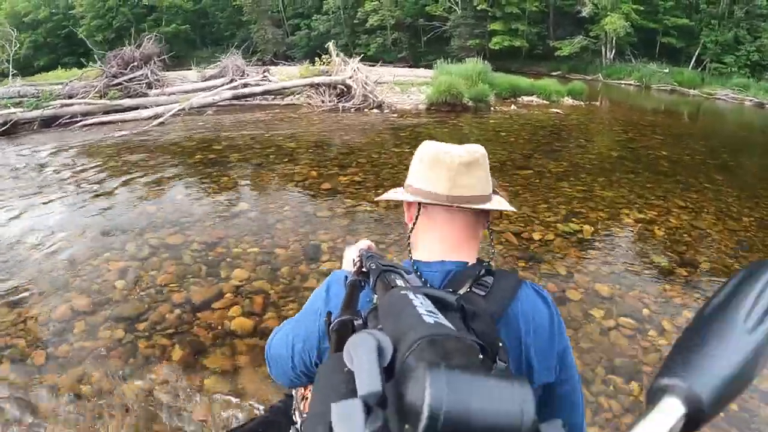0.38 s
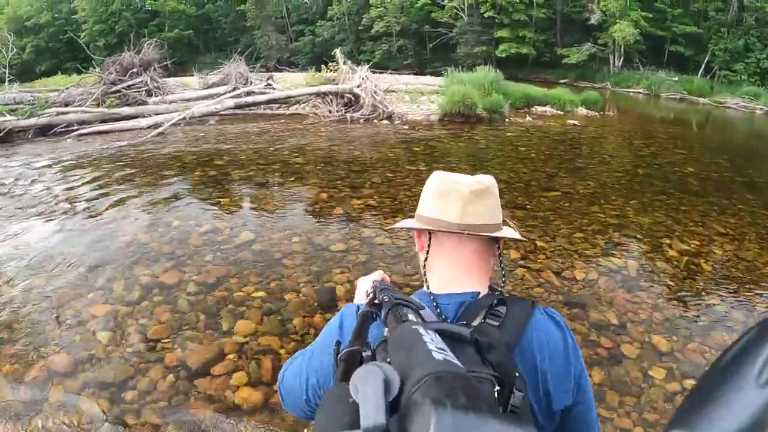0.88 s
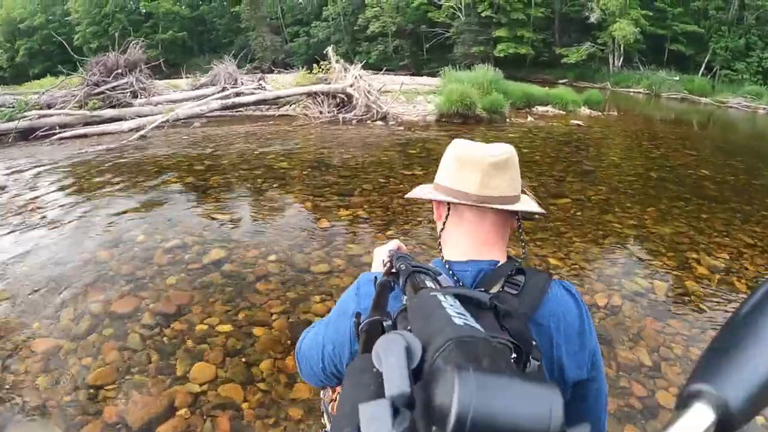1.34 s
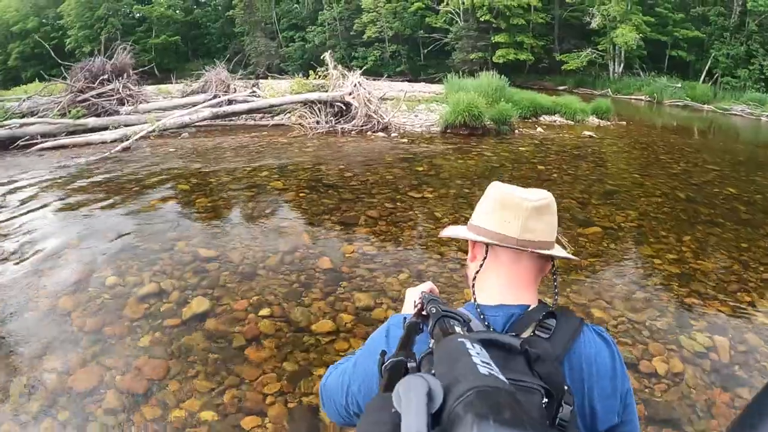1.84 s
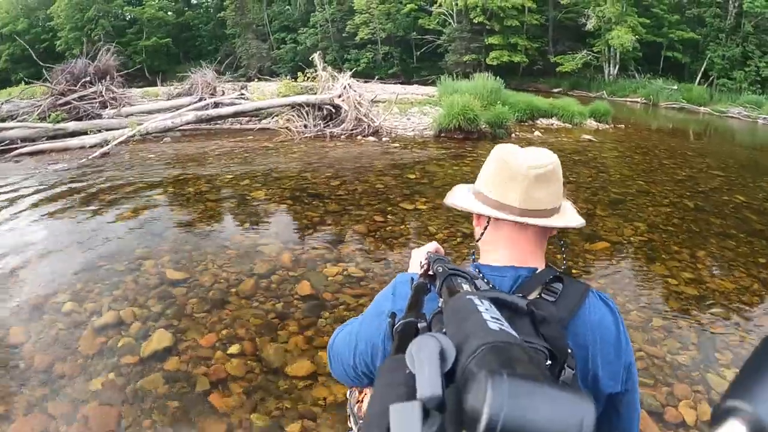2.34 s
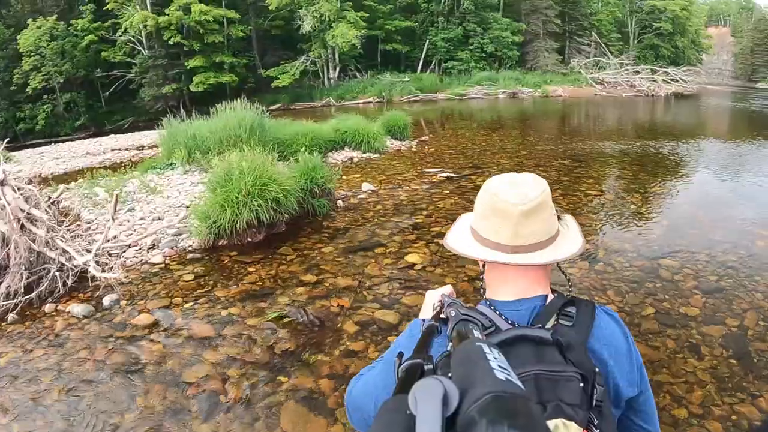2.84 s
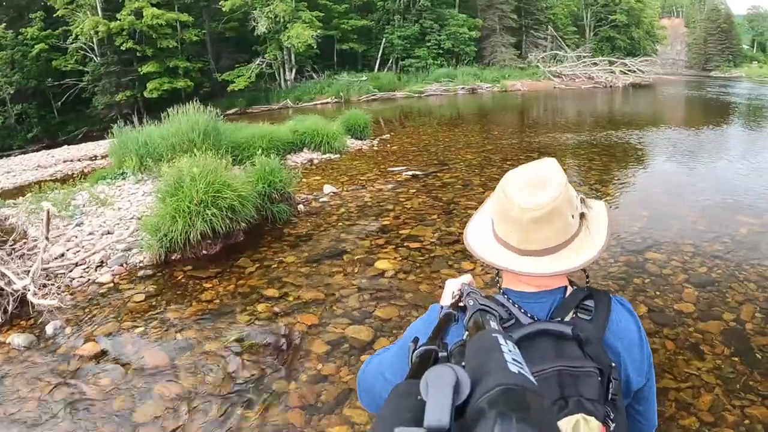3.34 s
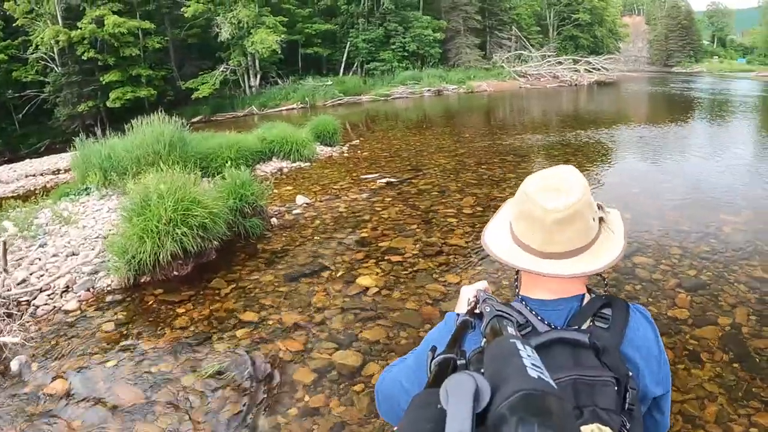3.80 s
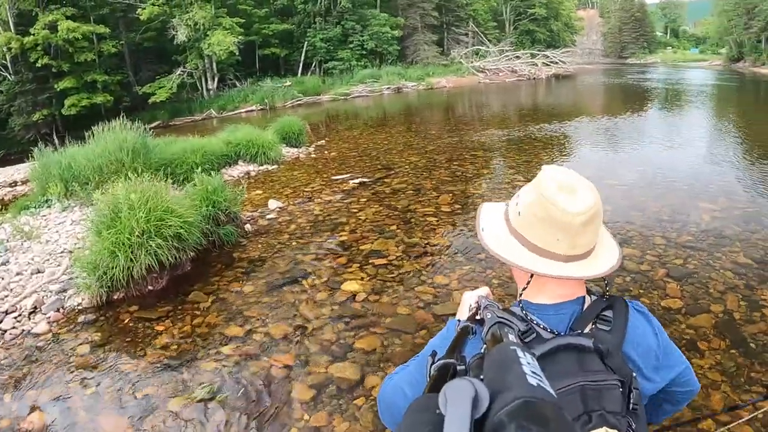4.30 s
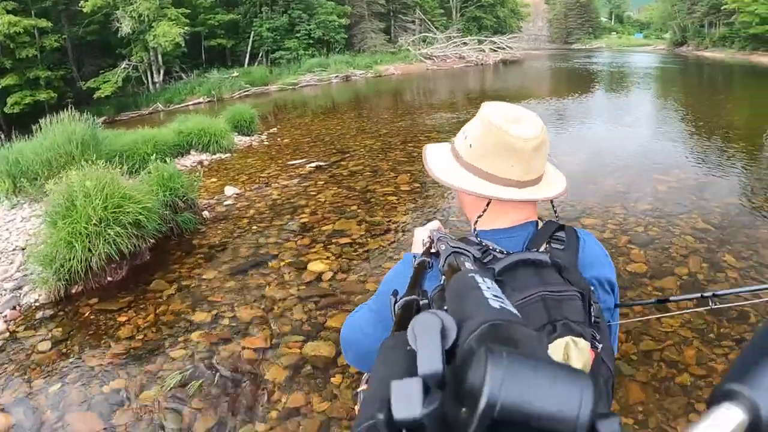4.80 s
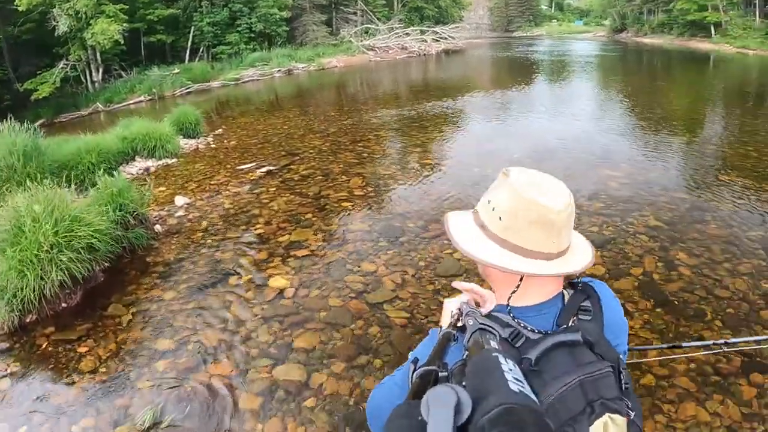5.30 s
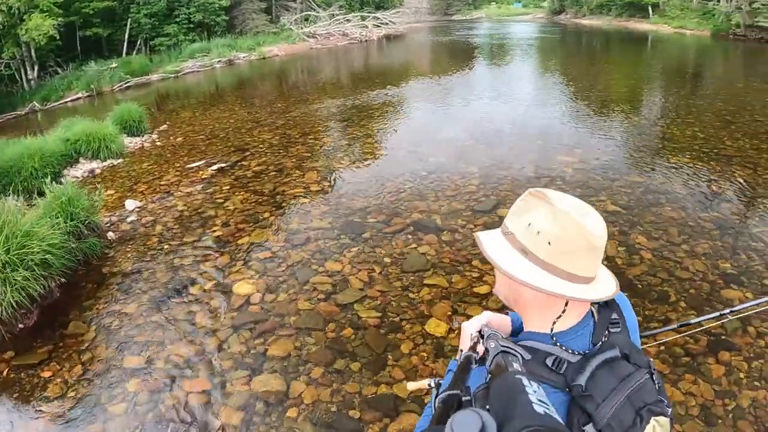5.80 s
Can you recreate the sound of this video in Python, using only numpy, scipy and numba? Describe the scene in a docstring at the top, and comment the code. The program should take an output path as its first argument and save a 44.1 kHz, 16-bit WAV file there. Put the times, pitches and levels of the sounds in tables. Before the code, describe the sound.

Close stereo sound of wading in a stony stream, heard from just behind. Thin, hissy splashing with small high plops gives way at a quick cut to fuller, darker sloshing, gulped air and rounder bubbles. The water calms towards the end and leans left; soft wind rumble flutters on the microphone throughout.

```python
"""Legs wade through a shallow stony river, heard from just behind, in two stretches joined by a quick fade:
first bright, thin splashing near the bank, then a louder, duller churn in deeper water.
Swarms of short damped tones (air bubbles) ring over filtered noise (the rush of the current), with single
plops and rising gurgles on top. Drops are short bursts of hiss; wind on the microphone ports is a low rumble."""
import sys
import numpy as np
from scipy import signal
from scipy.fft import rfft, irfft, next_fast_len
from scipy.io import wavfile
from scipy.ndimage import uniform_filter1d, map_coordinates
from numba import njit

SR = 44100
rng = np.random.default_rng(int(sys.argv[2]) if len(sys.argv) > 2 else 0)


def natural_amplitude(level_db):
    """Convert a level in decibels to a linear amplitude factor, elementwise."""
    exponent = np.asarray(level_db, float) / 20
    return 10 ** exponent


def store_pcm(level_fs):
    """Save levels as 16-bit WAV."""
    pcm = np.round(np.clip(level_fs, -1, 1) * 32767).astype(np.int16)
    wavfile.write(sys.argv[1], SR, np.atleast_2d(pcm).T)


N = 260542  # length in samples

JOIN_S, FADE_S = 2.666, 0.01  # the first stretch ends and the second begins here; length of the fade in
# per stretch: wind level between puffs; low wash between sloshes, relative to the churn
CALM_DB, WAKE_DB = (-53.5, -43), (-20.5, -12)

# colour of the water, one list per stretch: pitch_hz, relative_level_db
WATER_COLOUR = [
    [(13, -39), (22, -19), (55, 0), (110, -9.5), (190, -9.5), (300, -6), (467, -3), (705, -3.5), (832, -4),
     (1290, -4.5), (2120, -3), (6030, -20.5), (9370, -22.5), (15800, -29)],
    [(13, -33), (22, -5), (48, -2.5), (110, -10), (190, -15), (389, -6.5), (1060, -4.5), (1150, -5.5),
     (1770, -9.5), (2460, -15), (6880, -32), (10900, -43), (14300, -54)],
]
# the two ports differ in tone: pitch_hz, left_minus_right_db
PORT_LEAN = [(60, -5.5), (130, -2), (300, 0), (1000, 2), (5000, 2), (9000, 3.5), (15000, 4.5)]
# wind, low wash, churn and spray, in that order: low_hz, high_hz, bubbles_per_s (in each swarm),
# ring_cycles (each bubble takes 0.19 to 0.69 of this to decay), size_scatter_db, clumping_db,
# bubbles_over_rush_db, patchiness_db, quietest_db
LAYERS = [(14.5, 199.3, 33, 2.7, 4.5, 1, -20, 1, -59), (185.4, 430.6, 160, 3.65, 4.5, 1.5, -11, 3, -73),
          (450, 3242, 1100, 7.97, 2, 1.57, -3, 1.4, -59), (3263, 15670, 2800, 7.1, 3, 4.5, -1, 0.9, -48.5)]
# big single bubbles: start_s, level_db, pitch_hz
PLOPS = [(.048, -20.5, 450), (0.0813, -15, 407), (0.121, -22, 450), (.1644, -7.5, 1850), (0.198, -21, 400),
         (0.3685, -18, 1230), (0.409, -16.5, 1140), (.5315, -20.5, 563), (.588, -27, 335),
         (.7476, -14, 523), (.7543, -19, 1030), (0.793, -18, 1440), (.9149, -14, 2020),
         (.9663, -15.5, 2070), (1.1444, -14, 3080), (1.1495, -14.5, 1460), (1.1545, -14, 2020),
         (1.161, -15, 3270), (1.1586, -10, 2700), (1.166, -16.5, 1010), (1.209, -21, 573),
         (1.2197, -9, 2190), (1.2237, -16, 680), (1.2656, -14, 1980), (1.276, -20, 1030),
         (1.4779, -20, 342), (1.681, -15, 1110), (1.7014, -16.5, 306), (1.8069, -17, 610),
         (1.8268, -15, 2700), (2.0987, -11.5, 1820), (2.182, -12, 910), (2.1935, -10, 616),
         (2.2145, -17, 1800), (2.4854, -21.5, 273), (2.4968, -21.5, 450), (2.6784, -16, 1130),
         (2.6885, -11, 1110), (2.723, -11, 1300), (2.8516, -11, 441), (2.9747, -9.5, 2180),
         (3.1878, -8, 2020), (3.28, -13, 1060), (3.4472, -12.5, 3040), (3.631, -9.5, 1920),
         (3.743, -8, 1130), (3.887, -11.5, 960), (3.923, -11.5, 880), (4.168, -13.5, 2340),
         (4.259, -10.5, 1020), (4.2773, -13.5, 4000), (4.3651, -15, 780), (4.4976, -16, 1540),
         (4.5425, -11, 1255), (4.6853, -16, 250), (4.7687, -7.5, 790), (4.7846, -3, 760),
         (4.8086, -6.5, 680), (4.8744, -10.5, 625), (4.891, -13, 2980), (4.9552, -13, 1500),
         (5.117, -14, 1640), (5.3261, -26, 318), (5.41, -19, 2200), (5.489, -17, 960), (5.552, -18, 269),
         (5.754, -17, 2860), (5.8273, -13.5, 915)]
# drops that land on the surface: start_s, level_db, treble_db (bright hiss relative to dull hiss)
DROPS = [(1.145, -25, -20), (1.16, -26.5, 7), (1.294, -18, -4), (1.3214, -21.5, 8), (1.3488, -37, -6),
         (1.401, -28, 14.5), (1.48, -32, 12), (1.535, -32, 15), (1.685, -33, 14), (1.7649, -28, 4),
         (1.85, -36, 12), (1.875, -37, 12), (1.897, -29, 8), (2.072, -19, -5), (2.091, -21, 3),
         (2.4389, -22, -12), (2.511, -17.5, -10), (2.6249, -17, -10), (2.7147, -15.5, -12),
         (2.8883, -24, -10), (3.054, -19, -16), (3.399, -19, -25), (3.62, -19, -20), (3.708, -18, -24),
         (4.0444, -12, -12), (4.0821, -12, -26), (4.168, -15, -15), (4.2763, -18, -12), (4.589, -23, -10),
         (4.776, -18, -20), (4.888, -16, -15), (5.001, -21.5, -13), (5.1083, -24, -15), (5.204, -28, -12),
         (5.3084, -31, -17), (5.3732, -29, -10), (5.623, -17, -20), (5.7, -22, -8), (5.752, -25, -12)]
# how wide the water sounds, one list per stretch: pitch_hz, unrelated_under_shared_db
WATER_WIDTH = [
    [(30, -22), (70, -10), (170, -12), (350, -25), (1200, -30), (4000, -32), (9000, -28), (15000, -32)],
    [(30, -0.5), (70, -11.5), (160, -10), (350, -17.5), (1200, -13), (3200, -9.5), (4200, -27), (8000, -16),
     (15000, -11)],
]
# effort of the legs, one list per stretch: time_s, churn_db, spray_over_churn_db
LEG_EFFORT = [
    [(0, -28.5, -0.5), (.09, -26.5, 2.5), (.26, -29.5, -2), (.43, -30, -1), (.6, -35, 2), (.72, -36.5, 1),
     (.94, -29.5, -2), (1.1, -33, -3), (1.19, -30, -3.5), (1.36, -30.5, 0.5), (1.7, -31, 0.5),
     (1.87, -29.5, 1), (2.03, -31.5, -3.5), (2.21, -27.5, -1.5), (2.3, -29, 1), (2.42, -32.5, -3),
     (2.65, -29.5, -1)],
    [(2.68, -20, -10), (2.86, -19.5, -10.5), (3.1, -22.5, -8.5), (3.27, -22.5, -10), (3.37, -20, -11.5),
     (3.61, -21.5, -10), (3.72, -25.5, -10), (3.87, -26.5, -9.5), (4.04, -23, -10.5), (4.13, -26, -7.5),
     (4.29, -25.5, -9), (4.46, -25.5, -12), (4.54, -26, -11.5), (4.63, -29, -8), (4.72, -23.5, -10),
     (4.97, -27, -8.5), (5.06, -28.5, -10), (5.22, -33.5, -10.5), (5.31, -30.5, -13.5), (5.42, -35, -11),
     (5.56, -29, -12), (5.65, -27.5, -7.5), (5.74, -29.5, -13), (5.84, -27.5, -8.5), (5.9, -31, -10.5)],
]
# direction of the water: time_s, left_minus_right_db
BEARING = [(0, -1), (1.1, -1), (2.6, 0.2), (2.7, -0.5), (4.1, 0), (4.6, 2), (5.9, 3)]
# water heaved aside by a shin: crest_s, level_db, length_s
SLOSHES = [(.08, -31, 0.13), (.23, -33.5, 0.26), (.57, -40, 0.13), (1.12, -35.5, 0.18), (1.51, -35.5, 0.21),
           (1.7, -37, 0.043), (1.95, -32.5, 0.086), (2.21, -36, 0.047), (2.49, -32, 0.11),
           (2.64, -35, 0.066), (2.86, -24.5, 0.15), (3.0, -29.5, 0.52), (3.66, -38, 0.084),
           (4.02, -47, 0.079), (4.32, -30, 0.071), (4.6, -32.5, 0.14), (4.69, -30, 0.054),
           (4.95, -31.5, 0.41), (5.33, -34, 0.11), (5.56, -33, 0.087), (5.83, -40, 0.22)]
# puffs of wind on the ports, with low knocks among them (near 1.55, 2.86 and 3.36 s): crest_s, level_db,
# length_s
GUSTS = [(.05, -41, 0.18), (.25, -34, .14), (.48, -45, 0.092), (.62, -31, .16), (.76, -34, 0.087),
         (1.0, -42, .08), (1.1, -39, 0.11), (1.3, -43, 0.34), (1.55, -30.5, 0.11), (1.71, -34, 0.18),
         (2.0, -41, 0.25), (2.5, -34, .1), (2.72, -38, 0.12), (2.86, -29.5, 0.13), (3.36, -30.5, 0.045),
         (3.64, -22.5, 0.21), (4.3, -43, 0.12), (4.7, -33, 0.25), (5.25, -31, 0.59), (5.55, -32, 0.24),
         (5.75, -33.5, .2), (5.88, -39, 0.12)]
# air gulped under a boot: start_s, level_db, starting_pitch_hz, decay_s
GURGLES = [(.225, -24, 304, .012), (1.045, -28, 1330, .006), (1.228, -34, 693, .012), (2.2, -22, 614, .014),
           (2.815, -16.5, 303, .02), (2.93, -19, 331, 0.0293), (3.38, -17, 707, .014),
           (3.51, -15.5, 479, 0.022), (4.02, -21.5, 329, .015), (4.33, -19.5, 597, .022),
           (5.05, -22, 480, .012), (5.29, -26, 475, .02), (5.52, -25, 197, .025)]
# highest pitch let through in each stretch: top_hz
TOP_HZ = (15830, 14250)


def unit(x):
    """Scales a sound to an rms of 1."""
    return x / np.sqrt(np.mean(x ** 2) + 1e-20)


def along(points, hz):
    """Reads a curve of (pitch_hz, value) points on a log pitch axis."""
    point_hz, value = np.transpose(points)
    return np.interp(np.log(hz + 1), np.log(point_hz + 1), value)


def filtered(x, response):
    """Multiplies the spectrum of x by a response of frequency."""
    size = next_fast_len(N + 8192)  # spare room at the end for the filter's tail
    hz = np.fft.rfftfreq(size, 1 / SR)
    return irfft(rfft(x, size) * response(hz), size)[..., :N]


def curves(rows):
    """Draws straight lines between the rows: one curve for each column after the time."""
    time_s, *columns = np.transpose(rows)
    return [np.interp(np.arange(N) / SR, time_s, column) for column in columns]


def surges(rows):
    """Smooth bell-shaped swells; where they overlap their powers add."""
    t = np.arange(N) / SR
    power = np.zeros(N)
    for crest_s, level_db, length_s in rows:
        bell = np.exp(-(2 * (t - crest_s) / length_s) ** 2)
        power += (natural_amplitude(level_db) * bell) ** 2
    return np.sqrt(power)


def wobble(rate):
    """A smooth random curve with rate random points a second."""
    knots = rng.standard_normal(int(N * rate / SR) + 4)
    return map_coordinates(knots, [np.arange(N) * rate / SR])


@njit
def add(out, start, hz, cycles, size, rise, attack):
    """Adds damped sines with a soft start; the pitch climbs as each bubble nears the surface."""
    for g in range(len(start)):
        life = cycles[g] * SR / hz[g]  # samples in which it decays to 1/e
        first = int(start[g])
        for i in range(first + 1, min(len(out), first + int(7 * life) + 2)):
            u = max(i - start[g], 0.) / life
            phase = 2 * np.pi * cycles[g] * (u + rise * u * u / 2)
            out[i] += size[g] * np.exp(-u) * (1 - np.exp(-u / attack)) ** 2 * np.sin(phase)


def bubbles(low_hz, high_hz, rate, ring_cycles, scatter_db, clump_db):
    """Two unrelated swarms of ringing air bubbles, rms 1, that crowd together at the same moments."""
    crowding = natural_amplitude(clump_db * (.7 * wobble(22) + wobble(55)))
    crowd = np.cumsum(crowding)
    swarms = np.zeros((2, N))
    for swarm in swarms:
        u = rng.random((int(rate * N / SR), 4))
        start = np.interp(u[:, 0] * crowd[-1], crowd, np.arange(N))  # more starts where it is crowded
        hz = np.minimum(0.8165 * low_hz * (1.49 * high_hz / low_hz) ** u[:, 1], .4 * SR)
        size = hz * natural_amplitude(-scatter_db * np.log(1.02 - u[:, 2]))  # many weak, few strong, none huge
        cycles = ring_cycles * (0.38 + u[:, 3]) / 2
        add(swarm, start, hz, cycles, size, .1, .45)
    return unit(swarms)


def rush(patchy_db):
    """Rushing current: two unrelated noises, rms 1, with shared patches of random gain."""
    noise = signal.stft(rng.standard_normal((2, N)), nperseg=512)[2]
    patches = uniform_filter1d(rng.standard_normal(noise.shape[1:]), size=8, axis=0)  # across pitch
    patches = uniform_filter1d(patches, size=6, axis=1)  # across time
    patchy = noise * natural_amplitude(patchy_db * unit(patches))
    return unit(signal.istft(patchy, nperseg=512)[1][:, :N])


def placed(pair, low_hz, high_hz, colour, width):
    """Filters a pair to one layer's band and colour, then spreads it over the two ports."""
    def shape(hz):
        slopes = np.sqrt((1 + (low_hz / (hz + 1)) ** 6) * (1 + (hz / high_hz) ** 6))
        band = natural_amplitude(along(colour, hz)) / slopes
        return band * [np.ones_like(hz), natural_amplitude(along(width, hz))]

    mid, side = filtered(pair, shape)
    return np.array([mid + side, mid - side]) / np.sqrt(np.mean(mid ** 2))


def wind_and_river():
    """Bubble swarms on rushing noise: the wind follows its puffs, the water the shins and leg effort."""
    t = np.arange(N) / SR
    fade_out = np.clip((JOIN_S - t) / (2 * FADE_S), 0, 1)  # out slower than in
    fade_in = np.clip((t - JOIN_S) / FADE_S, 0, 1)
    gust, slosh = surges(GUSTS), surges(SLOSHES)
    levels = []
    for rows, calm_db, wake_db in zip(LEG_EFFORT, CALM_DB, WAKE_DB):
        churn_db, spray_db = curves(rows)
        wind = np.hypot(gust, natural_amplitude(calm_db))
        wash = np.hypot(slosh, natural_amplitude(churn_db + wake_db))
        levels.append([wind, wash, natural_amplitude(churn_db), natural_amplitude(churn_db + spray_db)])
    out = np.zeros((len(LAYERS), 2, N))
    for k, layer in enumerate(LAYERS):
        low_hz, high_hz, rate, ring_cycles, scatter_db, clump_db, mix_db, patchy_db, floor_db = layer
        swarm = bubbles(low_hz, high_hz, rate, ring_cycles, scatter_db, clump_db)
        pair = natural_amplitude(mix_db) * swarm + rush(patchy_db)
        for level, colour, width, fade in zip(levels, WATER_COLOUR, WATER_WIDTH, [fade_out, fade_in]):
            loudness = fade * np.hypot(level[k], natural_amplitude(floor_db))
            out[k] += loudness * placed(pair, low_hz, high_hz, colour, width)
    return out[0], out[1:].sum(axis=0)


def plops():
    """Big bubbles heard one by one; each splash brings four weaker bubbles of other sizes."""
    start_s, level_db, hz = np.transpose(PLOPS)
    out = np.zeros(N)
    cycles = 2.05 * (hz / 1000) ** 0.12  # smaller, higher bubbles ring for more cycles
    # the added dB makes up for the soft start
    add(out, start_s * SR, hz, np.maximum(cycles, .5), natural_amplitude(level_db + 3.5), .07, .28)
    u = rng.random((len(start_s), 4, 3))
    start = (start_s[:, None] + 0.019 * u[..., 0] ** 2) * SR  # up to 19 ms late
    pitch_hz = hz[:, None] * 2 ** (1.38 * u[..., 1] - .35)
    size = natural_amplitude(level_db[:, None] + 1.5 - 6.1 * u[..., 0] - 1.4 * u[..., 2])  # later ones are weaker
    add(out, start.ravel(), pitch_hz.ravel(), np.full(start.size, 1.6), size.ravel(), .07, .3)
    return out


def gurgles():
    """Gulped air escapes as long bubbles whose pitch climbs clearly."""
    start_s, level_db, hz, decay_s = np.transpose(GURGLES)
    out = np.zeros(N)
    cycles = np.maximum(hz * decay_s, 1)
    glide = 0.3  # rise of pitch over one decay time, as a share of the starting pitch
    add(out, start_s * SR, hz, cycles, natural_amplitude(level_db + 4), glide, .4)
    return out


def drops():
    """Flung drops land as bursts of hiss a few milliseconds long, some duller, some brighter."""
    def hiss(low_hz, high_hz):
        def band(hz):
            return 1 / np.sqrt((1 + (low_hz / (hz + 1)) ** 4) * (1 + (hz / high_hz) ** 10))
        return unit(filtered(rng.standard_normal(N), band))

    dull = hiss(3000, 6170)
    # the second stretch is duller
    bright = np.where(np.arange(N) / SR < JOIN_S, hiss(8100, 20000), hiss(7400, 10300))
    out = np.zeros(N)
    ms = np.arange(SR // 25) / SR * 1000
    envelope = np.exp(-ms / 3.03) * (1 - np.exp(-ms / 1.05))  # decay and attack in ms
    for start_s, level_db, treble_db in DROPS:
        first = round(start_s * SR)
        at = slice(first, first + len(ms))
        out[at] += natural_amplitude(level_db - 2.5) * envelope * (dull[at] + natural_amplitude(treble_db) * bright[at])
    return out


def scene():
    """The splashing drifts to the left; the wind stays on the ports."""
    wind, river = wind_and_river()
    water = river + plops() + gurgles() + drops()
    bearing_db, = curves(BEARING)
    return wind + water * natural_amplitude([bearing_db / 2, -bearing_db / 2])


def band_limit(x):
    """A steep low-pass at the top of the band."""
    return signal.sosfilt(signal.butter(12, 16920, fs=SR, output="sos"), x)


def record(dry):
    """Two ports of unequal tone, with a sharp upper limit that is lower in the second stretch."""
    ports = filtered(dry, lambda hz: natural_amplitude(along(PORT_LEAN, hz) * [[.5], [-.5]]))
    first, second = (filtered(ports, lambda hz: hz < top_hz) for top_hz in TOP_HZ)
    mix = np.where(np.arange(N) / SR < JOIN_S, first, second)
    return band_limit(mix)


dry = scene()
out = record(dry)
store_pcm(out)
```